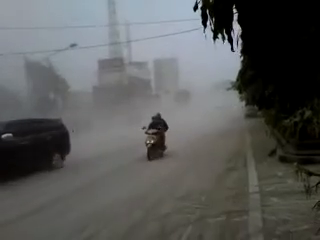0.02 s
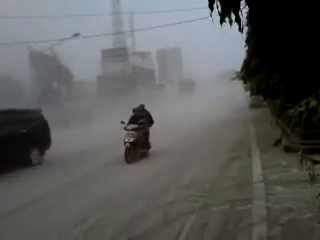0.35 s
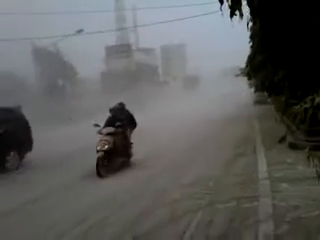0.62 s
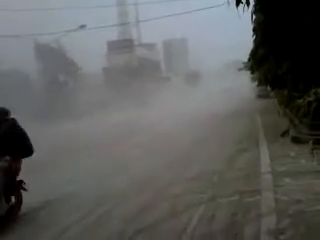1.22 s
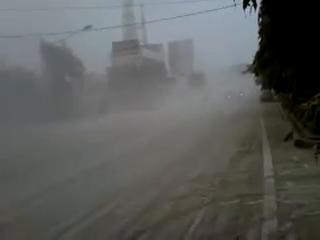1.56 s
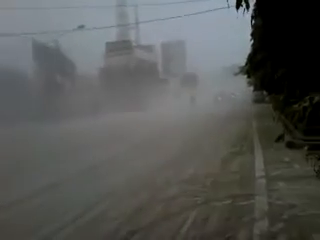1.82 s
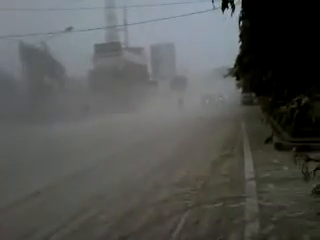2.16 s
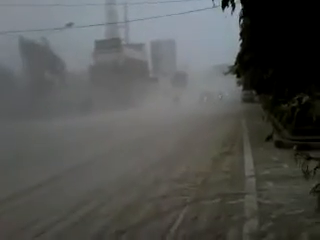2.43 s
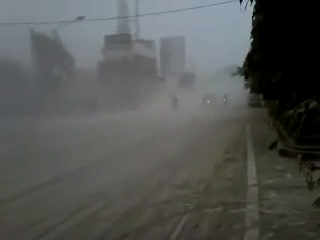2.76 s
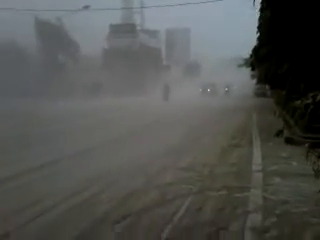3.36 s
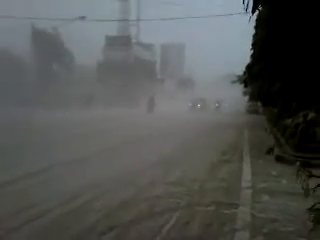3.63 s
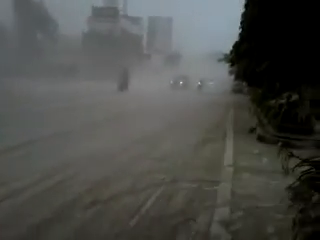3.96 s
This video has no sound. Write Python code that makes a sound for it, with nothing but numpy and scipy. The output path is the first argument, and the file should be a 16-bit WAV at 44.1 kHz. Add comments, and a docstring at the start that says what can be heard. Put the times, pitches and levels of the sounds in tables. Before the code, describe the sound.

A motorcycle thumps at low revs from the start, over rumbling traffic and hissing windblown dust. Tyres crunch on grit at about 1.2 seconds. The exhaust booms briefly around 1.4 and 2.2 seconds as tyre roar swells with a faint whine, then the engine gradually fades. Short scratchy rubs cross the microphone from about 1.9 to 3.8 seconds, and the wind thuds once just before 4 seconds.

```python
"""A dusty, windy street, heard through one narrow-band mono microphone. A single-cylinder
motorcycle thumps past at low revs and fades away: each firing is a pressure pulse that sets the
silencer ringing. Traffic rumbles, tyres roar, whine and crunch on grit, and blown dust hisses,
all as shaped noise. Something rubs over the microphone in short scratchy strokes of stick-slip
friction. The exhaust boom swells briefly as it passes, and the wind thuds once near the end."""
import sys
import numpy as np
from scipy import signal
from scipy.fft import rfft, irfft, next_fast_len
from scipy.io import wavfile
from scipy.ndimage import uniform_filter1d, map_coordinates

SR = 44100
rng = np.random.default_rng(int(sys.argv[2]) if len(sys.argv) > 2 else 0)


def int16_out(signal):
    """Quantize to a 16-bit WAV file."""
    q = np.round(np.clip(np.atleast_2d(signal).T, -1, 1) * 32767)
    wavfile.write(sys.argv[1], SR, q.astype(np.int16))


N = 176400
T = np.arange(N) / SR
LOW_CUT_HZ, TOP_HZ = 27, 7520


def amp(db):
    """Amplitude ratio: tenfold for every 20 dB."""
    return 10 ** (np.asarray(db) / 20)


def unit(x):
    """Normalisation to an rms of 1."""
    return x / np.sqrt(np.mean(x ** 2) + 1e-20)


def curve(rows, at=T):
    """Linear interpolation in time of each column after the first."""
    s, *cols = np.transpose(rows)
    return [np.interp(at, s, c) for c in cols]


def bell(offset, half_width):
    """Gaussian window: 1 at its centre, 1/e a half width away."""
    return np.exp(-(offset / half_width) ** 2)


def wobble(rate):
    """Smooth random modulation: a spline through `rate` knots a second."""
    return map_coordinates(rng.standard_normal(int(4 * rate) + 8), [T * rate], mode="mirror")


def filtered(x, response):
    """Linear filtering: the spectrum of x times a frequency response."""
    m = next_fast_len(N + 8192)
    return irfft(rfft(x, m) * response(np.fft.rfftfreq(m, 1 / SR)), m)[:N]


def noise(colour, tilt_db=0):
    """Spectral shaping: noise of rms 1 with a (Hz, dB) colour, tilted per octave."""
    f, db = np.transpose(colour)
    db = db + tilt_db * np.log2(f)
    response = lambda hz: amp(np.interp(np.log(hz + 1), np.log(f), db)) * (hz < TOP_HZ)
    return unit(filtered(rng.standard_normal(N), response))


def patchy(x, depth_db):
    """Time-frequency modulation: patches of the spectrum swell and sink; the result has rms 1."""
    spectra = signal.stft(x, nperseg=512)[2]
    field = uniform_filter1d(rng.standard_normal(spectra.shape), size=5, axis=0)
    field = uniform_filter1d(field, size=12, axis=1)
    return unit(signal.istft(spectra * amp(depth_db * unit(field)), nperseg=512)[1][:N])


def ring(t, hz, t60):
    """Damped free vibration: a sine that starts at t = 0 and falls 60 dB in t60 seconds."""
    age = np.maximum(t, 0)
    return np.sin(2 * np.pi * hz * age) * np.exp(-np.log(1000) * age / t60)


# Engine speed. Each row: time in seconds, firings per second.
FIRING_RATE = [(0, 20.92), (.5, 20.69), (1.1, 20.69), (1.6, 20.61), (2.2, 20.52), (2.7, 20.41),
               (3.2, 20.31), (3.6, 20.3), (4, 20.4)]
# The passing exhaust. Each row: time in seconds, thump level in dB, its centre frequency in Hz,
# its half length in cycles, silencer boom in dB.
EXHAUST_PULSE = [(0, -18.5, 195, 1, 4), (.45, -19, 222, 0.49, 2.5), (.75, -16, 246, 0.58, -0.5),
                 (1.05, -15, 252, 0.54, -1.5), (1.21, -16.5, 251, 0.55, -0.5), (1.38, -16, 254, .6, 2),
                 (1.65, -15.5, 252, 0.7, -2), (1.85, -18, 257, 0.54, -5.5), (2.15, -16.5, 229, 0.66, 3),
                 (2.28, -23.5, 239, 1, 3), (2.38, -19, 240, 0.59, -5.5), (2.55, -21, 243, 0.59, -5.5),
                 (2.94, -20, 255, 0.68, 0.5), (3.04, -24, 260, 0.5, -1.5), (3.5, -21.5, 284, 0.39, -3),
                 (3.72, -26.5, 277, 0.63, -5), (4, -24, 276, 0.26, -10)]
# Silencer resonances. Each row: frequency in Hz, level against the thump in dB before the boom
# is added, t60 in seconds, delay in seconds.
SILENCER_MODES = [(39.3, -28.5, 0.93, .002), (87.7, -12.5, 0.17, 0.0011), (116, -10.5, 0.042, 0.0031),
                  (194, -19, 0.097, 0.00087), (253, -24.5, 0.13, 0.0026), (327, -24, 0.034, 0.0024)]
# Exhaust tones that swell into a drone as it moves. Each row: peak time in seconds, half width
# in seconds, frequency in Hz, level against the thump in dB.
EXHAUST_DRONES = [(1.38, .1, 183, -18), (1.38, .08, 79.3, -23), (1.38, .1, 41, -28), (1.5, .2, 249, -21),
                  (2.1, 0.23, 41, -26), (2.15, .12, 181.5, -17), (2.2, .15, 101.5, -20.5),
                  (2.9, .8, 261, -31)]


def motorcycle():
    """Impulse excitation: each firing is one round thump, and the silencer and drones ring on."""
    first_firing_s, jitter_s, far_at_s = .0516, .00011, 3.1
    phase = np.cumsum(curve(FIRING_RATE)[0]) / SR
    phase -= np.interp(first_firing_s, T, phase)
    firings = np.interp(np.arange(np.ceil(phase[0]), phase[-1]), phase, T)
    out = np.zeros(N)
    for s in firings:
        time_draw, level_draw, pitch_draw = rng.standard_normal(3)
        db, hz, cycles, boom_db = curve(EXHAUST_PULSE, s)
        far = min(s / far_at_s, 1) ** 4  # far away, the wind makes the beats uneven
        hz *= np.exp(.1 * far * pitch_draw)
        db += (1.5 * far - .06) * level_draw
        span = slice(max(int((s - .01) * SR), 0), int((s + .2) * SR))
        t = T[span] - s - jitter_s * time_draw
        thump = np.cos(2 * np.pi * hz * t) * bell(hz * t, cycles)
        for mode_hz, mode_db, t60, delay in SILENCER_MODES:
            thump -= amp(mode_db + boom_db + rng.standard_normal()) * ring(t - delay, mode_hz, t60)
        for centre, width, drone_hz, drone_db in EXHAUST_DRONES:
            thump -= amp(drone_db) * bell(s - centre, width) * ring(t, drone_hz, t60=.25)
        out[span] += amp(db) * thump
    return out


# Traffic rumble. Each row: time in seconds, level in dB.
RUMBLE_LEVEL = [(0, -40.5), (1.1, -39.5), (1.4, -35), (1.8, -34), (2.2, -40.5), (2.3, -40), (2.9, -41),
                (3.3, -43), (4, -42.5)]
# Its spectrum. Each row: frequency in Hz, relative level in dB.
RUMBLE_SPECTRUM = [(20, -12.5), (40, -4), (60, -5.5), (100, -0.5), (150, -0.5), (250, 0.5), (380, -5.5),
                   (520, -17), (780, -18), (1100, -31), (4000, -46)]


def traffic_rumble():
    """Incoherent addition: traffic merges into low noise whose level wavers."""
    return amp(curve(RUMBLE_LEVEL)[0] + 1.5 * wobble(9.7)) * noise(RUMBLE_SPECTRUM)


# Tyre noise. Each row: time in seconds, level of the roar in dB, level of its gritty top in dB.
TYRE_LEVELS = [(0, -49.5, -74), (.6, -51, -62), (1.13, -45.5, -51.5), (1.27, -41, -46.5), (1.42, -43, -45),
               (1.58, -39.5, -43), (1.95, -37, -34.5), (2.21, -36.5, -37), (2.26, -40.5, -41),
               (2.6, -40.5, -45.5), (3.1, -46, -46), (3.5, -43.5, -43.5), (4, -44, -49.5)]
# Spectra of the two parts. Each row: frequency in Hz, relative level in dB.
ROAR_SPECTRUM = [(100, -29), (400, -2.5), (560, -2), (760, -1), (1020, -4), (1300, -2), (1850, -8.5),
                 (3000, -17.5), (7000, -36.5)]
GRIT_SPECTRUM = [(900, -18.5), (1800, -4), (2100, 1), (2700, -3.5), (3400, -2), (4000, -6.5), (4700, -8.5),
                 (7000, -21)]


def tyre_roar():
    """Roughness excitation: tyres rolling on the gritty road radiate broadband noise."""
    roar_db, grit_db = curve(TYRE_LEVELS)
    roar = amp(roar_db) * patchy(noise(ROAR_SPECTRUM), depth_db=1.6)
    grit = amp(grit_db) * patchy(noise(GRIT_SPECTRUM), depth_db=3)
    return (roar + grit) * amp(.7 * wobble(45))


# Blown dust. Each row: time in seconds, level in dB.
DUST_LEVEL = [(0, -42), (.5, -44.5), (1.1, -44.5), (1.6, -40.5), (1.92, -36), (2.03, -37), (2.2, -35.5),
              (2.4, -42.5), (3.1, -37), (3.78, -40), (3.93, -41), (4, -31)]
# Its spectrum. Each row: frequency in Hz, relative level in dB.
DUST_SPECTRUM = [(1000, -24.5), (2500, -16.5), (3950, -9.5), (4200, -1), (4800, .5), (5600, -2.5),
                 (6700, -5.5), (7400, -15.5)]
# Moments when the recorder's noise suppressor briefly ducks the high hiss.
# Each row: time in seconds, half width in seconds, gain in dB.
HISS_DROPOUTS = [(2.02, 0.016, -3), (2.06, 0.016, -0.5), (2.438, 0.012, 0), (2.74, .014, -1.5)]


def dust_hiss():
    """Superposition: countless blown grains blend into one high hiss."""
    dropout_db = sum(db * bell(T - s, width) for s, width, db in HISS_DROPOUTS)
    level_db = curve(DUST_LEVEL)[0] + dropout_db + .67 * wobble(40)
    return amp(level_db) * patchy(noise(DUST_SPECTRUM), depth_db=2.2)


# Strokes over the microphone. Each row: start in seconds, length in seconds, level in dB, attack
# and release in seconds, tilt in dB per octave, scrape centre in Hz, its lift in dB.
RUB_STROKES = [(0, 0.012, -35, 0.00056, 0.021, 17, 6300, 5), (0.089, 0.038, -36, 0.017, 0.012, 22, 6400, 1),
               (1.906, 0.083, -24.5, 0.086, 0.014, 2.5, 6150, 8),
               (2.085, 0.014, -23.5, 0.003, 0.01, 1, 6300, 8.5),
               (2.441, 0.074, -20.5, 0.058, 0.017, 0, 4800, 6.5),
               (2.508, 0.12, -22.5, 0.012, 0.024, -1.5, 5000, 7.5),
               (2.644, 0.036, -24.5, .014, 0.014, 0, 4900, 11.5),
               (2.679, .04, -22.5, 0.013, 0.009, -3, 4850, 16),
               (2.747, 0.2, -32.5, 0.07, 0.038, 3.5, 4600, 4),
               (2.867, 0.14, -27.5, 0.13, 0.081, 0, 4900, 6.5),
               (3.04, 0.23, -34.5, 0.13, 0.0064, -0.5, 4700, 6),
               (3.31, 0.24, -34, 0.025, 0.031, 2.5, 4500, 4), (3.415, 0.0972, -19, 0.059, .01, -2, 4300, 4),
               (3.512, 0.042, -18.5, .01, 0.041, -3, 5100, 3.5),
               (3.54, 0.15, -25.5, 0.017, 0.037, 0, 4800, 2.5),
               (3.617, 0.089, -19.5, 0.048, 0.038, 1.5, 4800, 6.5),
               (3.7, 0.023, -32, 0.023, 0.17, -4.5, 3200, 2)]
# Their spectrum before tilt and lift. Each row: frequency in Hz, relative level in dB.
RUB_SPECTRUM = [(300, -23), (800, -31.5), (1300, -20), (2000, -19), (2900, -10), (3600, -6), (3950, -9.5),
                (4250, -4), (4750, -5.5), (5500, -6.5), (6100, -8.5), (6700, -10), (7300, -20.5)]
# Momentary snags. Each row: time in seconds, half width in seconds, gain over the stroke in dB.
RUB_SNAGS = [(2.505, .003, 2), (2.586, .0015, 3.5), (2.601, 0.001, 10.5), (3.004, .006, 4)]


def microphone_rubs():
    """Stick-slip friction: each stroke swells, scrapes at its own pitch, catches and lets go."""
    scrape_width_hz = 600
    out = np.zeros(N)
    for s, length, db, attack, release, tilt_db, scrape_hz, lift_db in RUB_STROKES:
        swell = np.sin(np.pi / 2 * np.clip((T - s) / attack, 0, 1)) ** 2
        fade = np.clip(1 - (T - s - length) / release, 0, 1)
        peak = lambda hz: amp(lift_db / (1 + ((hz - scrape_hz) / scrape_width_hz) ** 2))
        scrape = filtered(noise(RUB_SPECTRUM, tilt_db), peak)
        out += amp(db) * swell * fade * patchy(scrape, depth_db=1.8)
    snag_db = sum(db * bell(T - s, width) for s, width, db in RUB_SNAGS)
    slip_db, waver_db = .8 * wobble(500), .5 * wobble(55)
    return out * amp(snag_db) * unit(amp(slip_db + waver_db))


# Car treads. Each row: time when nearest in seconds, spread in seconds, frequency in Hz, level in dB.
TREAD_TONES = [(.1, 0.038, 1500, -47.5), (.2, .6, 1490, -53), (2.14, 0.56, 1257, -49),
               (2.25, 0.96, 1624, -48.5)]


def tread_whines():
    """Narrow-band noise: each car's tread sings in a band that swells, flutters and fades."""
    width_hz, flutter_db = 70, 3
    out = np.zeros(N)
    for s, spread, whine_hz, db in TREAD_TONES:
        band = filtered(rng.standard_normal(N), lambda hz: 1 / (1 + ((hz - whine_hz) / width_hz) ** 2))
        whine = unit(band * amp(flutter_db * wobble(45)))
        out += amp(db) * whine / np.sqrt(1 + ((T - s) / spread) ** 4)
    return out


# A wheel in grit. Each row: start in seconds, level in dB, t60 in seconds, tilt in dB per octave.
GRIT_SPRAYS = [(1.152, -27.5, 0.37, 1.5), (1.191, -28, 0.28, 2.5), (1.205, -29, 0.12, 2.5),
               (1.22, -36.5, 0.43, 5)]
# Their spectrum before the tilt. Each row: frequency in Hz, relative level in dB.
CRUNCH_SPECTRUM = [(200, 3.5), (600, -7.5), (1200, 3), (1800, -6.5), (2300, -8), (3600, -19.5),
                   (4700, -10.5), (7000, -25.5)]


def grit_crunches():
    """Impact noise: a wheel throws up sudden sprays of grit that die away exponentially."""
    rise_s = .002
    out = np.zeros(N)
    for s, db, t60, tilt_db in GRIT_SPRAYS:
        age = np.maximum(T - s, 0)
        envelope = (1 - np.exp(-age / rise_s)) * np.exp(-np.log(1000) * age / t60)
        spray = unit(noise(CRUNCH_SPECTRUM, tilt_db) * amp(1.5 * wobble(400)))
        out += amp(db) * envelope * spray
    return out


# Brief low swells. Each row: peak time in seconds, half width in seconds, level in dB.
LOW_SWELLS = [(1.4, 0.056, -40.5), (1.96, 0.028, -35), (2.09, 0.02, -33.5), (2.205, 0.05, -31),
              (3.953, 0.019, -29.5)]
# Their spectrum. Each row: frequency in Hz, relative level in dB.
SWELL_SPECTRUM = [(20, -7.5), (40, -9.5), (110, 0.5), (220, -6.5), (350, -9), (700, -32)]


def low_swells():
    """Amplitude modulation: low noise swells as exhaust boom, and as one wind thud near the end."""
    envelope = sum(amp(db) * bell(T - s, width) for s, width, db in LOW_SWELLS)
    return envelope * noise(SWELL_SPECTRUM)


def scene():
    """Linear superposition: all sources add at one microphone, the same in both channels."""
    mono = motorcycle() + traffic_rumble() + tyre_roar() + dust_hiss()
    mono += microphone_rubs() + tread_whines() + grit_crunches() + low_swells()
    return np.array([mono, mono])


def record(dry):
    """Band limiting: the recorder drops the deepest bass and keeps nothing above its upper edge."""
    high_pass = lambda hz: hz ** 4 / (hz ** 4 + LOW_CUT_HZ ** 4)
    low_pass = lambda hz: np.clip((TOP_HZ - hz) / 200 + .5, 0, 1)
    return np.array([filtered(ch, lambda hz: high_pass(hz) * low_pass(hz)) for ch in dry])


dry = scene()
out = record(dry)
int16_out(out)
```